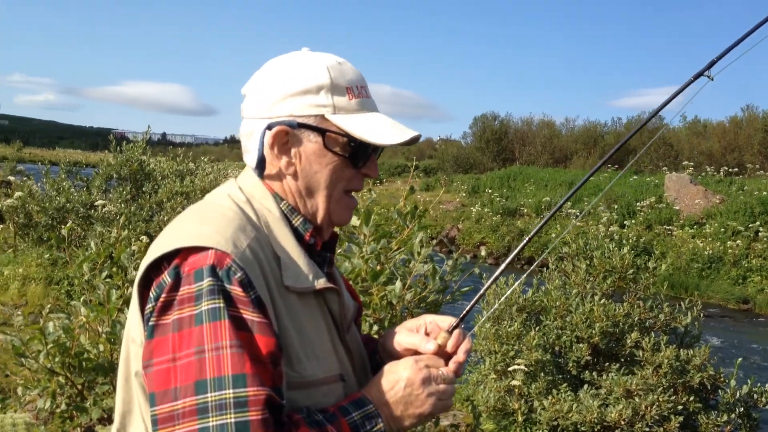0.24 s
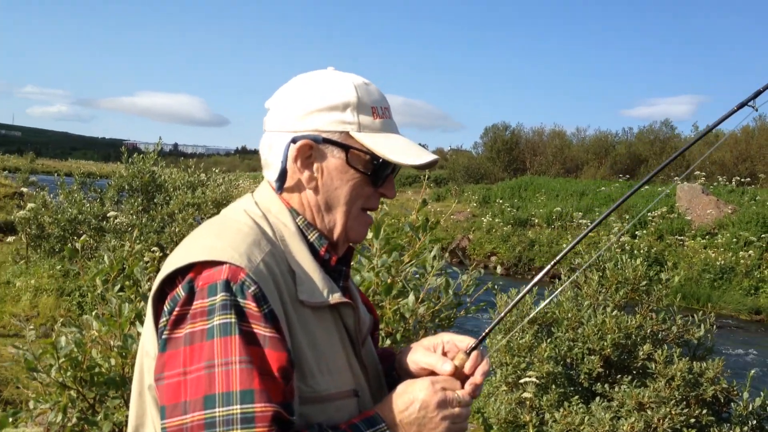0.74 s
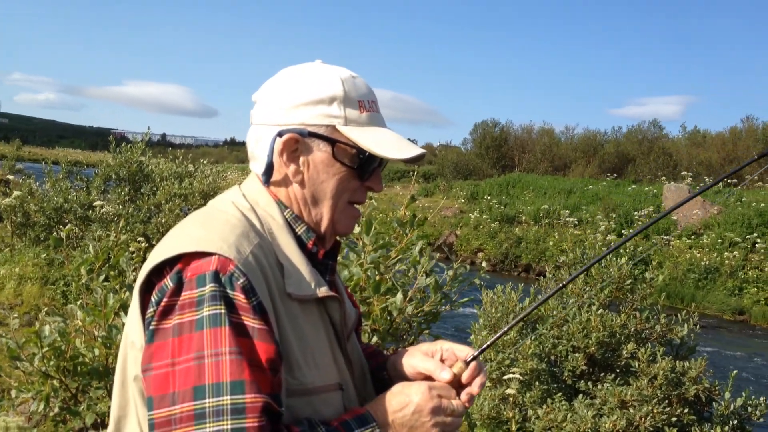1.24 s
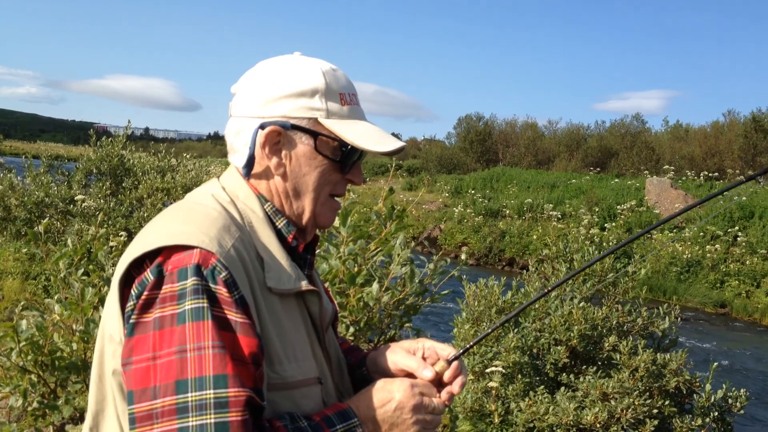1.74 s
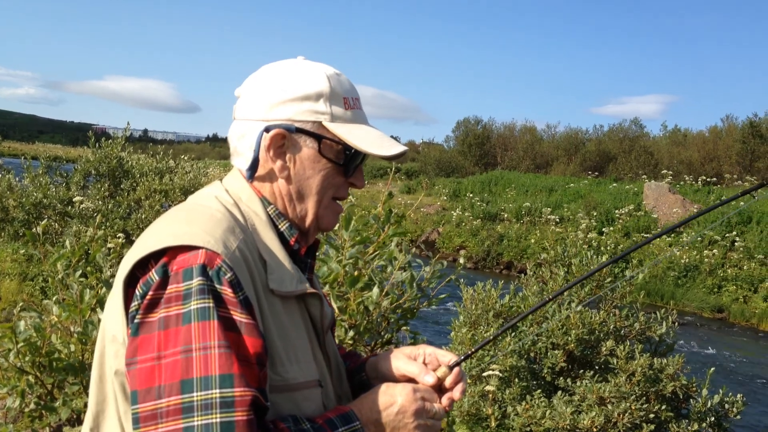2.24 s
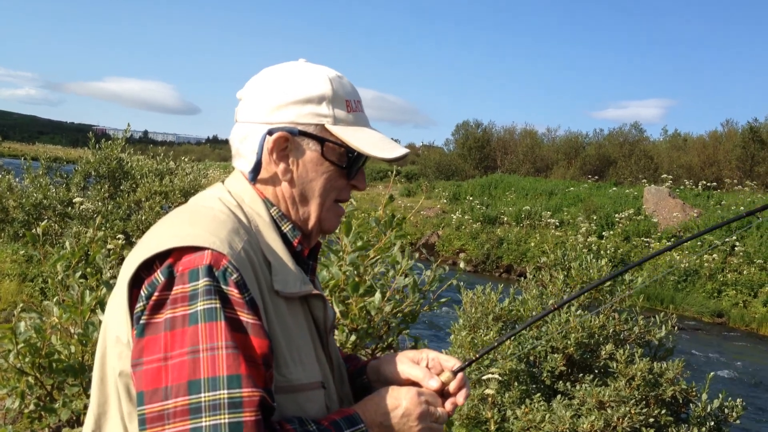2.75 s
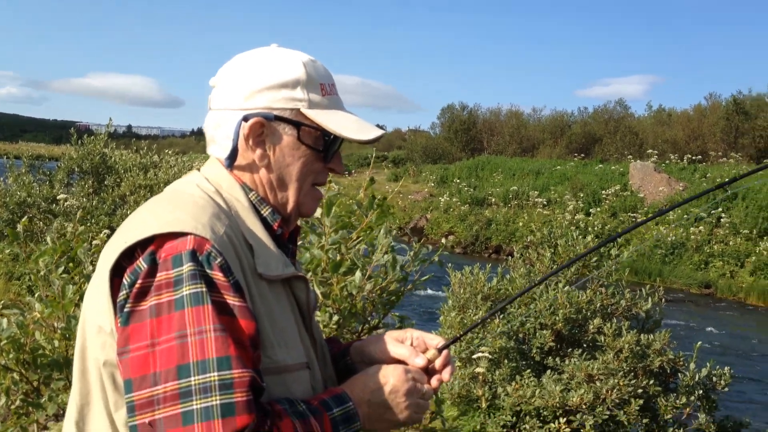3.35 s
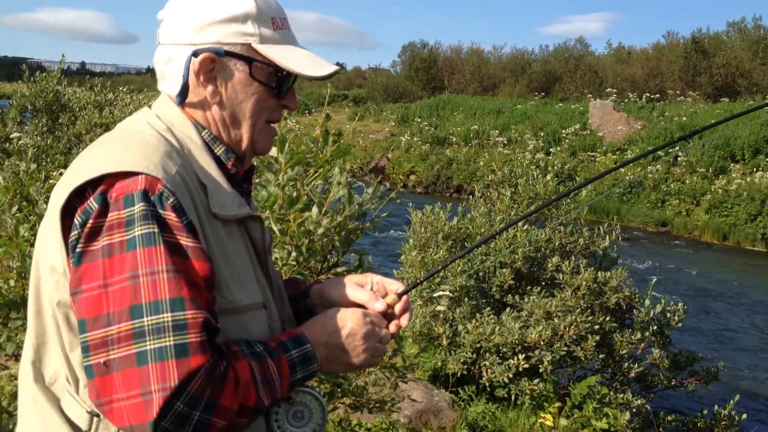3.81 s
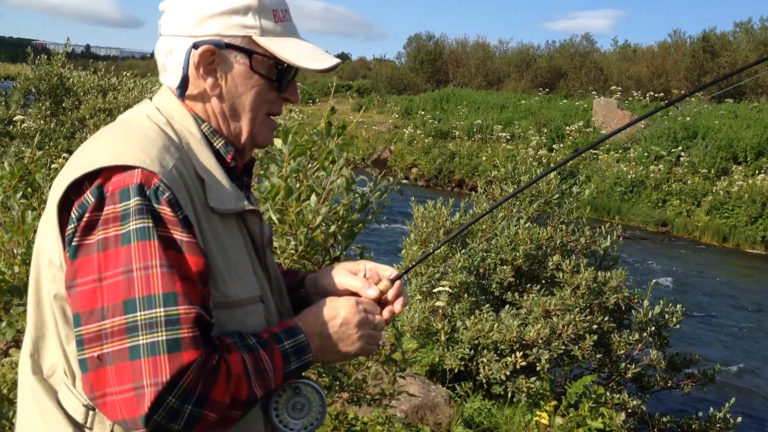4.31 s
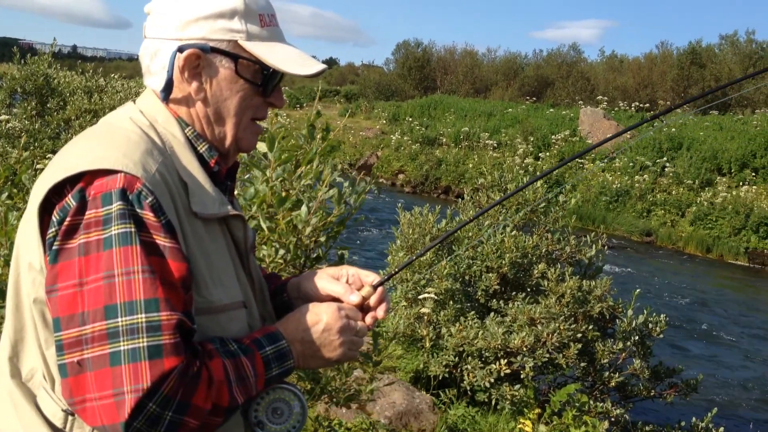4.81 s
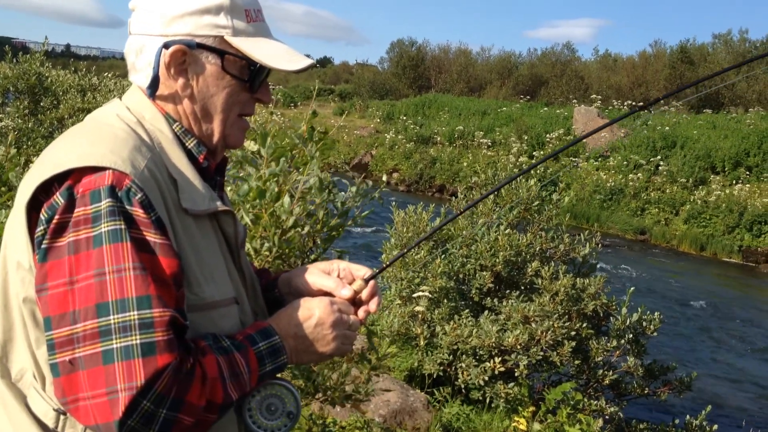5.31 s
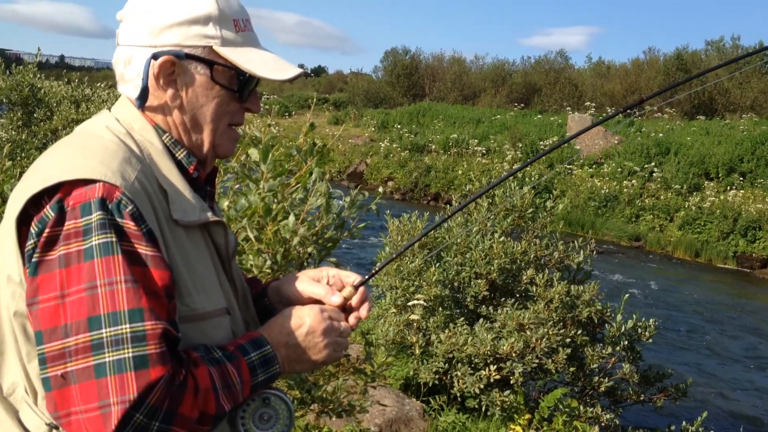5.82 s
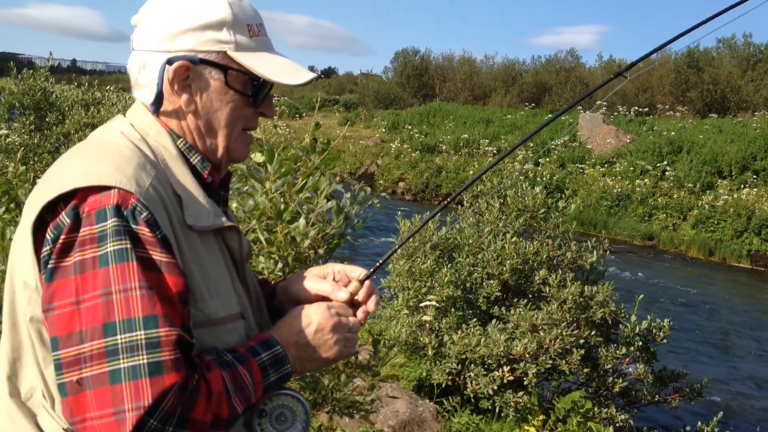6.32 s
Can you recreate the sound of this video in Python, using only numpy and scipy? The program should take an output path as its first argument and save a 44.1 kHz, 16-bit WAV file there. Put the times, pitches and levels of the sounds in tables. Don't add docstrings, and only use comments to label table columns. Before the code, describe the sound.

A quiet river rushes throughout as a soft, bubbly hiss. One crisp reel click sounds at the very start, then only water and brief low wind bumps near 0.75 and 1.25 seconds. From about 1.75 the fly reel ticks, quickening then easing until 2.4, with scattered clicks to 2.9. A second, faster ratchet runs to about 3.45, followed by close ticks; the fastest whirring burst comes from 3.65 to 4.0, ending in a short flurry by 4.15. After a pause, slower, uneven clicking goes from 4.55 to 5.5, and again from 5.7 to 6.1, leaving water and wind until 6.5. Clicks are bright, dry and metallic, with a tiny double contact and short rattly scatter. Wind thumps and flutters heavily from 3.6 to 5.1, then eases. Small close outdoor microphone, thin deep bass.

```python
import sys
import numpy as np
from scipy import signal
from scipy.fft import rfft, irfft, next_fast_len
from scipy.io import wavfile
from scipy.ndimage import uniform_filter1d, map_coordinates

SR = 44100
rng = np.random.default_rng(int(sys.argv[2]) if len(sys.argv) > 2 else 0)


def materialize(psi):
    bounded = np.clip(np.atleast_2d(psi).T, -1, 1)
    quanta = np.round(bounded * 32767).astype(np.int16)
    wavfile.write(sys.argv[1], SR, quanta)


def how_loud(loudness_db):
    steps = np.asarray(loudness_db, float) / 20
    return 10 ** steps


N = 289296


def unit(x):
    return x / np.sqrt(np.mean(x ** 2) + 1e-20)


def curves(rows):
    s, *cols = np.transpose(rows)
    return [np.interp(np.arange(N) / SR, s, c) for c in cols]


def wobble(rate):
    knots = rng.standard_normal(int(N * rate / SR) + 4)
    return map_coordinates(knots, [np.arange(N) * rate / SR])


def filtered(x, points):
    m = next_fast_len(N + 8192)
    hz, db = np.transpose(points)
    gain = how_loud(np.interp(np.log(np.fft.rfftfreq(m, 1 / SR) + 1), np.log(hz + 1), db))
    return irfft(rfft(x, m) * gain, m)[..., :N]


def coloured(x, points):
    return unit(filtered(x, points))


def placed(times, rows):
    at = np.round(np.asarray(times) * SR).astype(int)[:, None] + np.arange(rows.shape[1])
    return np.bincount(at.ravel(), rows.ravel(), N + SR)[:N]


def bubbles(s, hz, db):
    t = np.arange(SR // 100) / SR
    cycles = hz[:, None] * t
    tone = np.sin(2 * np.pi * cycles * (1 + 12 * t))
    return placed(s, how_loud(db)[:, None] * tone * cycles * np.exp(-cycles / 2.83))


# pitch_hz [Hz], level_db [dB per Hz]
RIVER_COLOUR = [(50, -43), (100, -11.5), (160, -9), (280, -8.5), (400, -15), (720, -2), (900, -5),
                (2000, -3.5), (4600, -16.5), (7800, -31.5), (9500, -34), (13000, -33.5), (15300, -33)]
# time_s [s], level_db [dB]
RIVER_LEVEL = [(0, -51), (.4, -50), (.76, -52.5), (1.2, -49.5), (1.7, -50.5), (2.6, -51), (4.16, -50.5),
               (4.31, -47), (4.42, -51), (5.6, -49.5), (6.15, -51), (6.56, -49)]
# start_s [s], peak_db [dB], pitch_hz [Hz]
NEAR_DROPS = [(.839, -51, 4800), (1.015, -45, 3370), (1.207, -57, 6300), (1.578, -56, 6500),
              (1.713, -50, 4480), (4.186, -41, 3800), (4.299, -40.5, 3700), (4.312, -43, 2800),
              (4.34, -42, 1850), (4.386, -49, 5000), (5.022, -41.5, 1990), (6.133, -43, 2830),
              (6.316, -50, 4530)]
SPRAY_DB, SPRAY_DB_PER_S, SPRAY_GROWS = -3, .5, 0.54


def river(patchy_db=1.5):
    level_db, = curves(RIVER_LEVEL)
    spray_db = SPRAY_DB + SPRAY_DB_PER_S * np.arange(N) / SR + SPRAY_GROWS * (level_db - level_db.mean())
    z = signal.stft(rng.standard_normal(N + 512), nperseg=512)[2]
    patches = uniform_filter1d(uniform_filter1d(rng.standard_normal(z.shape), 5, 0), 8, 1)
    patchy = signal.istft(z * how_loud(patchy_db * unit(patches)), nperseg=512)[1][:N]
    rush = coloured(patchy, RIVER_COLOUR)
    when, pitch, size = rng.random((1200, 3)).T
    plops = unit(bubbles(when * N / SR, 800 * 15 ** pitch, 14 * size - 32 * pitch ** 1.5))
    spray = signal.sosfilt(signal.butter(2, 5000, "high", fs=SR, output="sos"), rush)
    flow = how_loud(level_db + 6.0 + 0.088 * wobble(9.7))
    water = flow * (rush + how_loud(-12.5) * plops + (how_loud(spray_db) - 1) * spray)
    s, db, hz = np.transpose(NEAR_DROPS)
    return water + bubbles(s - .0006, hz, db + 6.5)


def spun(times, force, count):
    rows = np.column_stack([times, force])
    before = 3 * (rows[0] - rows[1]) + rows[2]
    after = 3 * (rows[-1] - rows[-2]) + rows[-3]
    ends = np.vstack([before, rows, after])
    steps = 1 + np.arange((len(rows) - 1) * count + 1) / count
    return np.transpose([map_coordinates(c, [steps], mode="nearest") for c in ends.T])


# start_s [s],
# main_ring_db [dB], low_body_db [dB]
SLOW_TEETH = [(0.0373, -26.5, -50), (2.408, -20, -33), (2.4547, -20, -26.5), (2.5155, -21.5, -30),
              (2.5444, -22.5, -26), (2.6496, -22.5, -23.5), (2.7719, -22, -22), (2.8191, -24, -23),
              (2.8597, -24, -29), (3.4463, -24, -32), (3.4672, -26, -33), (3.5016, -23, -26),
              (3.5298, -22, -23.5), (3.5523, -23, -46), (3.5747, -21.5, -49), (3.598, -23, -51),
              (3.6187, -22, -35), (3.6341, -26, -49), (4.0129, -20, -23.5), (4.0243, -22, -34),
              (4.0363, -22, -31), (4.0496, -22, -38), (4.0639, -21, -22), (4.0798, -22, -23),
              (4.0993, -22.5, -21), (4.1295, -23.5, -23),
              (4.5691, -27, -28), (4.6064, -23.5, -29), (4.658, -22.5, -31), (4.7044, -23, -27.5),
              (4.7392, -24.5, -29), (4.7756, -25, -51), (4.8159, -23.5, -48), (4.8553, -23, -33),
              (4.8924, -23, -25), (4.9298, -22.5, -31), (4.9762, -21.5, -27.5), (5.0958, -21.5, -24.5),
              (5.1555, -21, -31), (5.2127, -20, -29), (5.244, -21, -46), (5.2839, -21, -28),
              (5.3368, -20.5, -49), (5.3819, -21, -28), (5.424, -20.5, -30), (5.4846, -21.5, -43),
              (5.6987, -21, -31), (5.7502, -23.5, -27), (5.7903, -24, -23), (5.8375, -24, -25.5),
              (5.882, -25, -24.5), (5.9257, -23.5, -29), (5.972, -26, -28.5), (6.0218, -25, -40),
              (6.092, -25.5, -32)]
FIRST_RUN = [
    1.7566,
    1.8661,
    1.9542,
    2.0288,
    2.0907,
    2.1424,
    2.2049,
    2.2839,
    2.3696,
]
SECOND_RUN = [
    2.8892,
    2.9627,
    3.0123,
    3.0753,
    3.1407,
    3.2175,
    3.2948,
    3.3744,
    3.4311,
]
THIRD_RUN = [
    3.6459,
    3.6958,
    3.7438,
    3.7847,
    3.8227,
    3.8622,
    3.9036,
    3.9482,
    4.0024,
]
# main_ring_db [dB], low_body_db [dB]
FIRST_FORCE = [(-27.5, -33), (-23, -28.5), (-26, -25.5), (-26, -43), (-24, -35), (-25, -27), (-22.5, -27),
               (-19.5, -28), (-18.5, -49)]
# main_ring_db [dB], low_body_db [dB]
SECOND_FORCE = [(-25, -29), (-24.5, -33), (-22.5, -26.5), (-20.5, -37), (-20.5, -57), (-24, -26.5),
                (-26.5, -26), (-25, -26.5), (-22, -35)]
# main_ring_db [dB], low_body_db [dB]
THIRD_FORCE = [(-21.5, -41), (-24.5, -23), (-23, -32), (-22, -32), (-22.5, -26), (-22.5, -23.5),
               (-25.5, -29), (-20.5, -31), (-22, -29)]
UPPER_DB, UPPER_FOLLOWS, UPPER_DB_PER_OCT = -27, 0.17, 0.45
TOP_DB, TOP_FOLLOWS, TOP_DB_PER_OCT = -32.5, 0.058, 2.5
SLOWEST_PER_S = 25


def teeth():
    first = spun(FIRST_RUN, FIRST_FORCE, count=3)
    second = spun(SECOND_RUN, SECOND_FORCE, count=4)
    third = spun(THIRD_RUN, THIRD_FORCE, count=6)
    clicks = np.vstack([SLOW_TEETH, first, second, third])
    s, ring_db, low_db = clicks[np.argsort(clicks[:, 0])].T
    octaves = np.log2(np.maximum(1 / np.gradient(s), SLOWEST_PER_S) / 30)
    swing_db = ring_db + 25
    upper_db = UPPER_DB + UPPER_FOLLOWS * swing_db + UPPER_DB_PER_OCT * octaves
    top_db = TOP_DB + TOP_FOLLOWS * swing_db + TOP_DB_PER_OCT * octaves
    return np.column_stack([s, ring_db, low_db - ring_db, upper_db - ring_db, top_db - ring_db])


def turning(clicks, size):
    return unit(uniform_filter1d(uniform_filter1d(rng.standard_normal((clicks, size)), 7, 0), 5, 0))


def scattered(s, db, colour, rise, t60, late_db, late_t60):
    t = np.arange(SR // 12) / SR
    shape = (1 - np.exp(-(t / rise) ** 2)) * (how_loud(-60 * t / t60) + how_loud(late_db - 60 * t / late_t60))
    steady = rng.standard_normal(len(t))
    shifting = unit(turning(len(s), size=6) @ rng.standard_normal((6, len(t))))
    loose = rng.standard_normal(shifting.shape)
    paths = .45 * steady + .85 * shifting + .25 * loose
    return filtered(placed(s, how_loud(db)[:, None] * shape * paths), colour)


# pitch_hz [Hz], level_db [dB], time_to_fade_60_db_s [s]
MAIN_RING = [(4254, -2.5, 0.0033), (4546, 7, 0.0035), (4990, -6, 0.0037)]
# pitch_hz [Hz], level_db [dB], time_to_fade_60_db_s [s]
LOW_BODY = [(1720, 0, 0.01), (2215, 5.5, 0.007), (2800, -114, 0.004), (3200, 1.5, 0.0047)]
# pitch_hz [Hz], level_db [dB], time_to_fade_60_db_s [s]
UPPER_RING = [(5640, 5, 0.0022), (7160, 0, 0.0044), (7620, -4.5, 0.0035)]
# pitch_hz [Hz], level_db [dB], time_to_fade_60_db_s [s]
TOP_RING = [(9400, -9, 0.0073), (10880, -4.5, 0.0053), (14100, -13, 0.005), (14600, -6.5, 0.0029)]
# delay_s [s], level_db [dB]
CLICK_CONTACTS = [
    (0, -13),
    (.00067, 3.5),
    (.0024, -41),
    (.0047, -15),
    (.0078, -22),
]
# pitch_hz [Hz], level_db [dB per Hz]
RATTLE_COLOUR = [(760, -41), (1300, -41), (1600, -4), (2650, -6.5), (2760, -1.5), (3510, -5), (4640, -3),
                 (5620, -11), (7870, -6.5), (8800, -37), (11400, -52), (19400, -120)]
# pitch_hz [Hz], level_db [dB per Hz]
SIZZLE_COLOUR = [(5290, -56), (9000, -6), (10000, -8), (11200, -6.5), (12800, -23), (13500, -10.5),
                 (14700, -11.5), (15300, -5)]
# pitch_hz [Hz], level_db [dB]
REEL_SHADOW = [(500, -30), (1300, -0.5), (3600, 2), (3950, -1.5), (4250, 1.5), (8450, 0.5), (8750, -15.5),
               (9200, -5.5), (9700, -0.5), (12200, 1), (12700, 6), (13200, 3)]
# pitch_hz [Hz], level_db [dB]
TILTED_COLOUR = [(6800, 0.5), (7800, 2.5), (8750, 6.5), (9800, 3.5), (11800, 1.5), (12700, 2), (13600, -2),
                 (15200, -2)]
TILT_S = 4.3
TOOTH_SCATTER_S, TOOTH_SCATTER_DB = .00008, 1.2
PITCH_DRIFT, CONTACT_DRIFT_DB = .015, 1.0


def reel():
    clicks = teeth()
    main_db, low_db, upper_db, top_db = clicks[:, 1:].T
    s = clicks[:, 0] + TOOTH_SCATTER_S * rng.standard_normal(len(clicks))
    s = np.round(s * SR) / SR
    t = np.arange(SR // 50) / SR
    ringing = np.zeros(N)
    speed = np.clip(0.0061 / np.gradient(s), 0, 1)[:, None]
    groups = [(MAIN_RING, 0 * s, -2.5, 0.063), (LOW_BODY, low_db, -5.5, 0),
              (UPPER_RING, upper_db, 1, 0), (TOP_RING, top_db, 1.5, 0)]
    for modes, rel_db, group_db, sharpens in groups:
        for hz, db, t60 in modes:
            chance = turning(len(s), size=2 + len(CLICK_CONTACTS))
            bend = 1 + PITCH_DRIFT * chance[:, :1] + sharpens * speed
            fade = how_loud(-60 * t / t60) * (1 - np.exp(-t / 0.00041))
            ring = fade * np.sin(2 * np.pi * hz * t * bend)
            uneven_db = 1.5 * chance[:, 1] + TOOTH_SCATTER_DB * rng.standard_normal(len(s))
            size = how_loud(main_db + rel_db + group_db + db + uneven_db)
            for k, (delay, hit_db) in enumerate(CLICK_CONTACTS):
                hit = size * how_loud(hit_db + CONTACT_DRIFT_DB * chance[:, 2 + k])
                ringing += placed(s + delay, hit[:, None] * ring)
    body = scattered(s, main_db + upper_db + 9.0, RATTLE_COLOUR,
                     rise=.0036, t60=0.023, late_db=-15.5, late_t60=0.1)
    sizzle = scattered(s, main_db + top_db + 3.5, SIZZLE_COLOUR,
                       rise=0.0032, t60=0.051, late_db=-19.5, late_t60=0.14)
    sound = filtered(ringing + body + sizzle, REEL_SHADOW)
    return np.where(np.arange(N) < TILT_S * SR, sound, filtered(sound, TILTED_COLOUR))


# start_s [s], hold_s [s], buffet_db [dB], sharp_part_db [dB against the buffet]
WIND_GUSTS = [(0.228, .005, -49, -15), (0.731, 0.023, -32.5, -7), (0.777, 0.034, -36.5, -20),
              (1.093, 0.078, -48, -18), (1.251, 0.013, -31.5, -22), (1.545, .12, -58, -19),
              (1.933, .005, -50, -22), (2.9, 0.092, -52.5, -14), (3.122, 0.047, -38, -24),
              (3.21, 0.045, -36, -9.5), (3.282, 0.042, -26.5, -10.5), (3.38, 0.034, -46, -19),
              (3.44, 0.07, -34.5, -16), (3.59, 0.31, -34.5, -0.5), (3.802, 0.14, -28, -4),
              (3.966, 0.15, -24.5, -4), (4.163, .25, -29.5, -12), (4.462, 0.12, -27.5, -6),
              (4.636, 0.019, -28, -10.5), (4.728, 0.267, -29, -4.5), (5.016, 0.09, -29, -12.5),
              (5.145, 0.025, -32, -18), (5.21, 0.12, -51.5, -21), (5.378, 0.032, -39, -13),
              (5.459, .12, -38, -14), (5.694, .005, -39.5, -25), (5.742, 0.12, -49, -27),
              (5.997, 0.023, -41.5, -20), (6.156, 0.099, -33.5, -20), (6.328, 0.22, -39.5, -21)]
RISE_DB_PER_S, FALL_DB_PER_S = 596, 456
CALM_DB, CALM_SHARP_DB = -67, -61


def gusts():
    s, hold, db, sharp_db = np.transpose(WIND_GUSTS)[:, :, None]
    t = np.arange(0, N + 64, 64) / SR
    rise_db = RISE_DB_PER_S * np.maximum(s - t, 0)
    fall_db = FALL_DB_PER_S * np.maximum(t - s - hold, 0)
    gain = how_loud(db - rise_db - fall_db)
    dull = np.sqrt(how_loud(2 * CALM_DB) + np.sum(gain ** 2, axis=0))
    sharp = np.sqrt(how_loud(2 * CALM_SHARP_DB) + np.sum((gain * how_loud(sharp_db)) ** 2, axis=0))
    return [np.interp(np.arange(N) / SR, t, g) for g in (dull, sharp)]


# pitch_hz [Hz], level_db [dB per Hz]
DULL_COLOUR = [(20, -47), (60, -31), (110, -6), (180, 3), (280, -3), (420, -13), (700, -63), (1500, -120)]
# pitch_hz [Hz], level_db [dB per Hz]
SHARP_COLOUR = [(60, -58), (150, -18), (330, 1), (450, -1), (700, -8.5), (1100, -17.5), (1800, -55),
                (4000, -120)]
# pitch_hz [Hz], level_db [dB per Hz]
HEAVE_COLOUR = [(15, -13), (40, -2), (80, 0), (130, -8), (250, -56)]
# start_s [s], peak_db [dB], pitch_hz [Hz]
EDDY_THUMPS = [(0.722, -10.5, 255), (0.733, -14.5, 200), (0.784, -17, 177), (1.24, -13.5, 195),
               (3.282, -15, 217), (3.599, -6, 285), (3.674, -9, 310), (3.743, -8.5, 186), (3.782, -9, 210),
               (3.852, -8, 211), (3.868, 0.5, 310), (3.959, -8, 248), (4.01, -14, 420), (4.013, -2, 284),
               (4.054, -33, 186), (4.08, -4, 312), (4.125, -9, 212), (4.282, -8.5, 230), (4.494, -16, 238),
               (4.518, 1, 230), (4.526, -3, 536), (4.595, -9, 297), (4.799, -23, 190), (4.838, -7.5, 276),
               (4.854, -4, 285), (4.875, -36, 194), (4.896, -3.5, 395), (4.968, -3.5, 239),
               (6.005, -15.5, 193), (6.187, -38, 178)]
HEAVE_DB, HEAVE_GROWS, HEAVE_SWING_DB = -51, 0.75, 4


def wind():
    dull, sharp = gusts()
    lumps = wobble(60)
    low = unit(how_loud(3.15 * lumps) * coloured(rng.standard_normal(N), DULL_COLOUR))
    spikes = rng.standard_normal(N) * how_loud(2.5 * lumps + 3.5 * wobble(170))
    buffeting = dull * low + sharp * coloured(spikes, SHARP_COLOUR)
    smeared = uniform_filter1d(dull, SR // 6) / how_loud(-41.5)
    heave = smeared ** HEAVE_GROWS * how_loud(HEAVE_DB + HEAVE_SWING_DB * wobble(5.6))
    swings = heave * coloured(rng.standard_normal(N), HEAVE_COLOUR)
    s, db, hz = np.transpose(EDDY_THUMPS)
    u = np.arange(SR // 25) / SR * hz[:, None] - 1
    push = -np.cos(2 * np.pi * u) * np.exp(-(u / 0.59) ** 2)
    return buffeting + swings + placed(s, how_loud(db - 9.5)[:, None] * push)


def scene():
    return (river() + reel() + wind())[None]


def low_pass(x):
    return signal.sosfilt(signal.butter(12, 16640, fs=SR, output="sos"), x)


# pitch_hz [Hz], level_db [dB]
MICROPHONE_RESPONSE = [(15, -16), (50, -22.5), (110, -2.5), (200, -0.5), (15200, 0), (15450, -44),
                       (16600, -47)]


def record(dry):
    heard = filtered(dry, MICROPHONE_RESPONSE)
    return low_pass(heard)


dry = scene()
out = record(dry)
materialize(out)
```